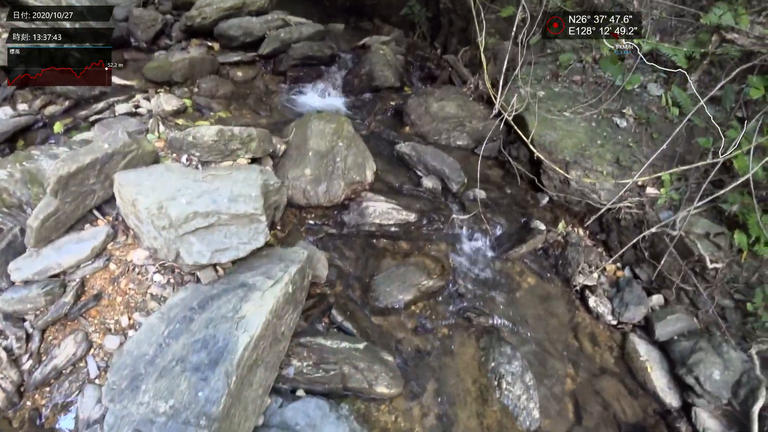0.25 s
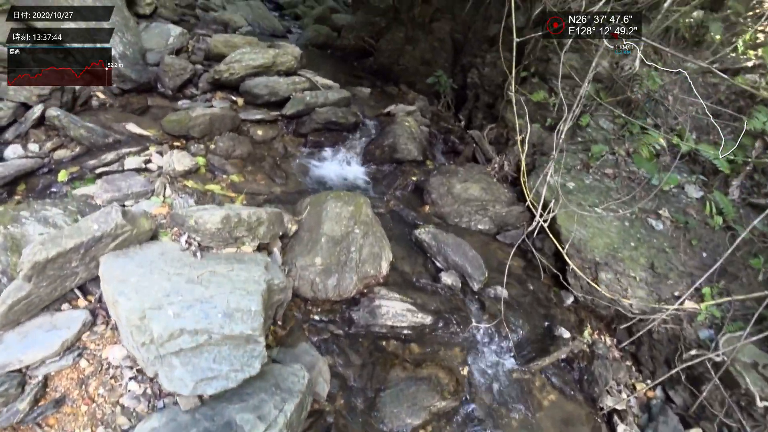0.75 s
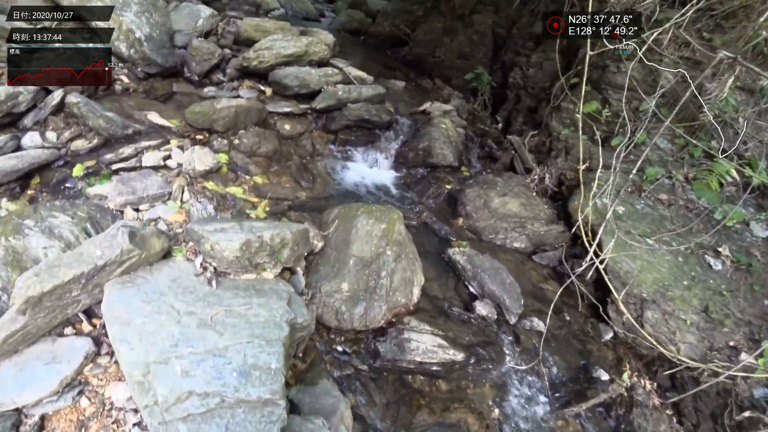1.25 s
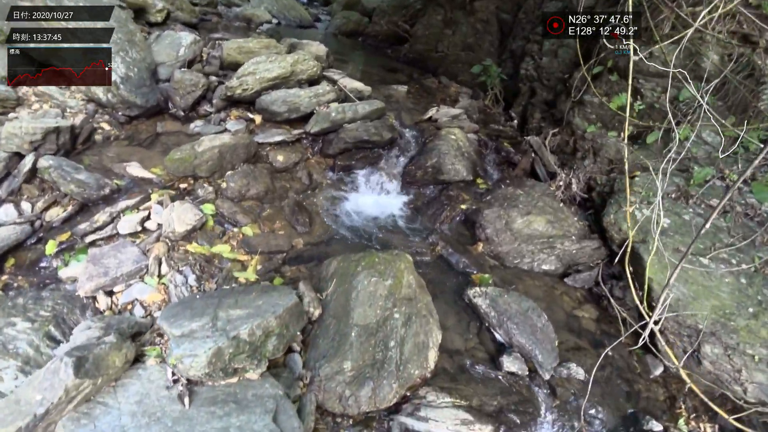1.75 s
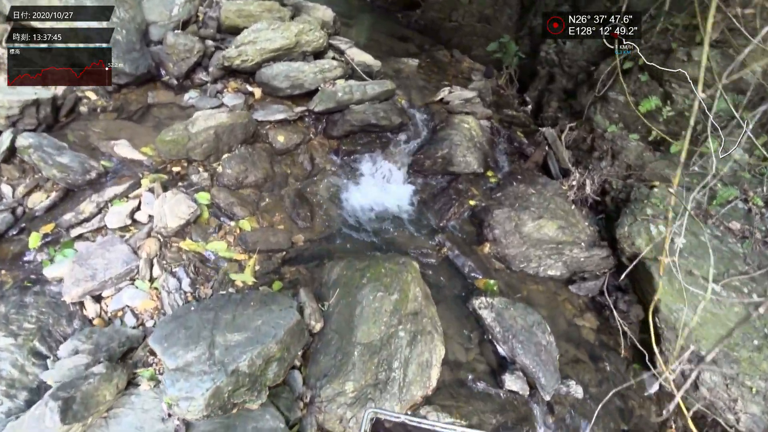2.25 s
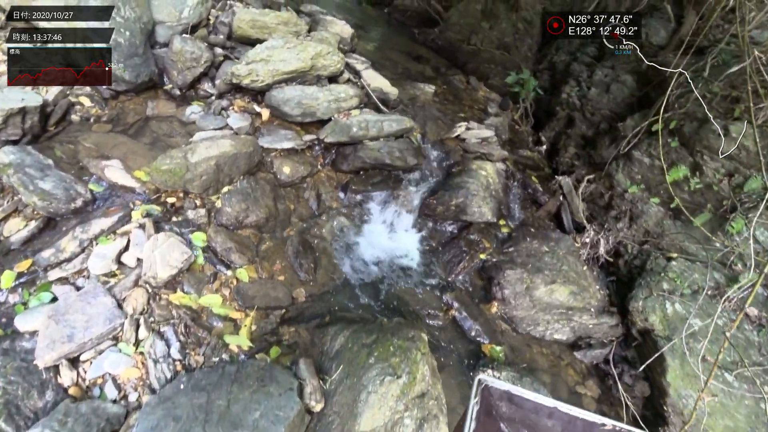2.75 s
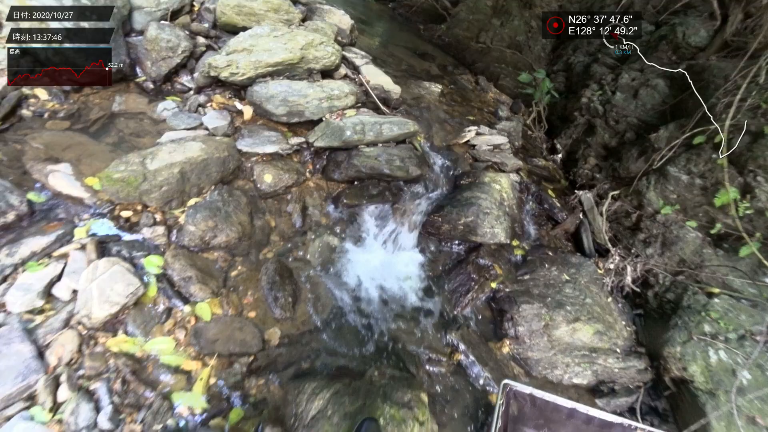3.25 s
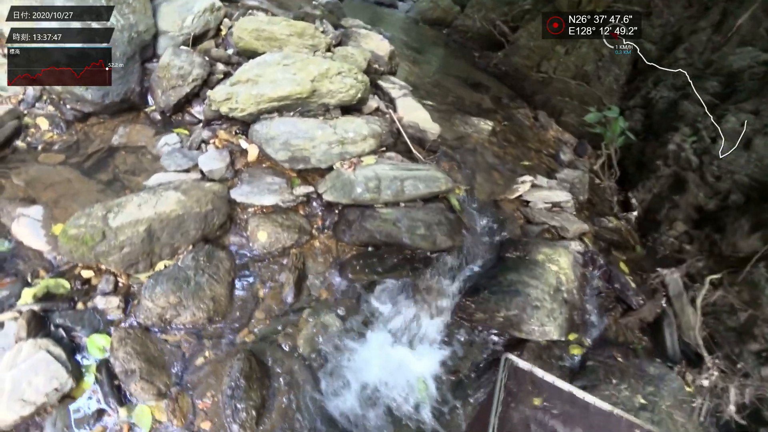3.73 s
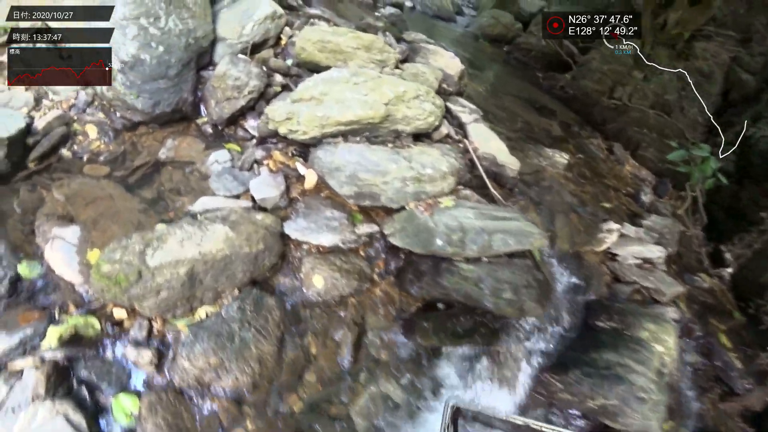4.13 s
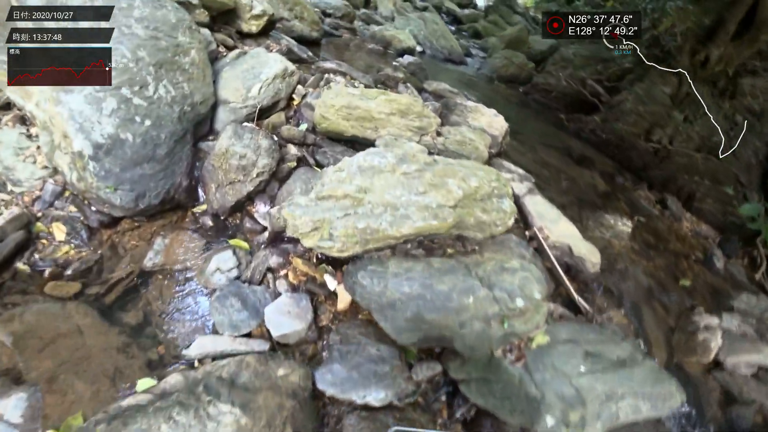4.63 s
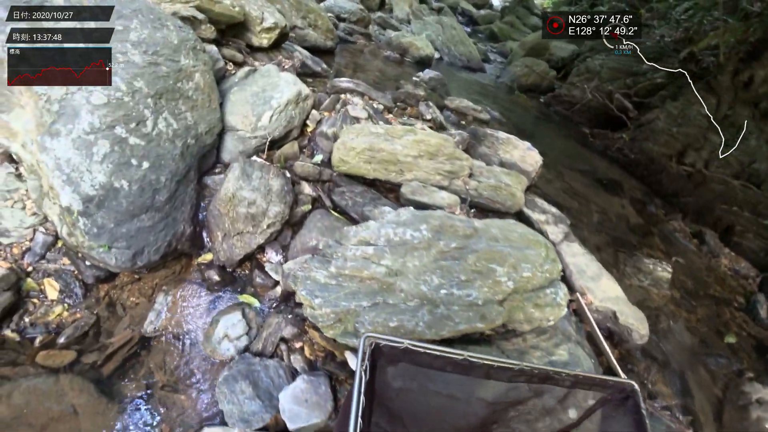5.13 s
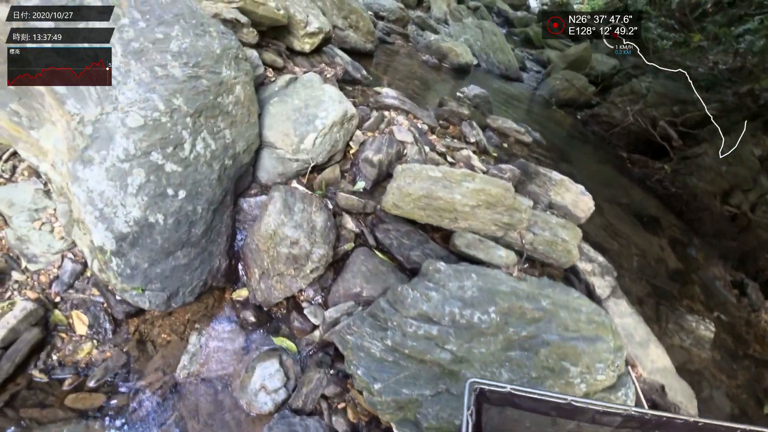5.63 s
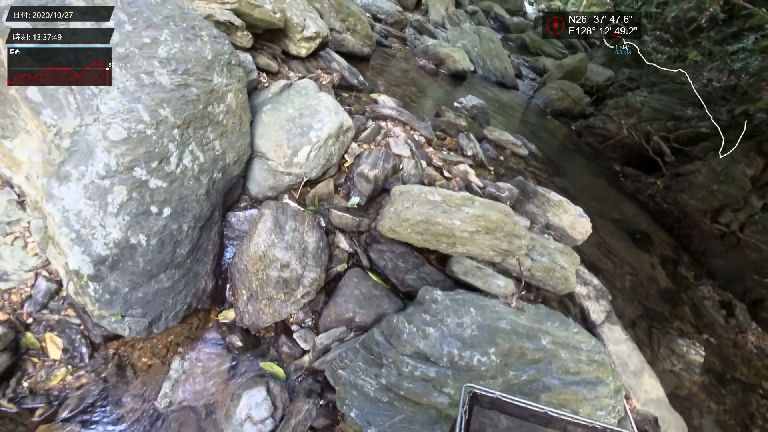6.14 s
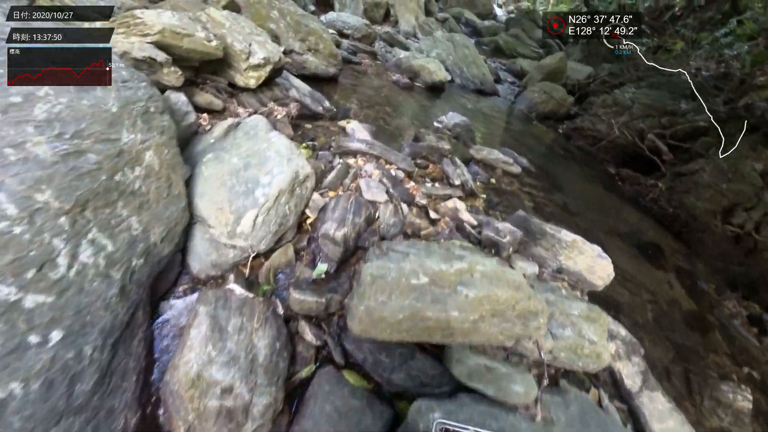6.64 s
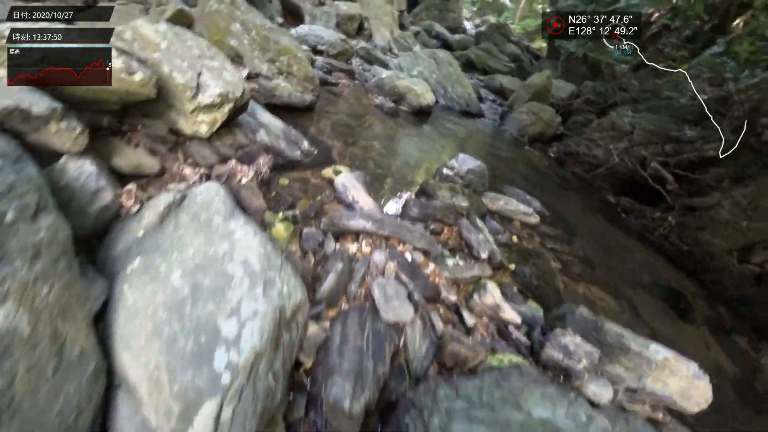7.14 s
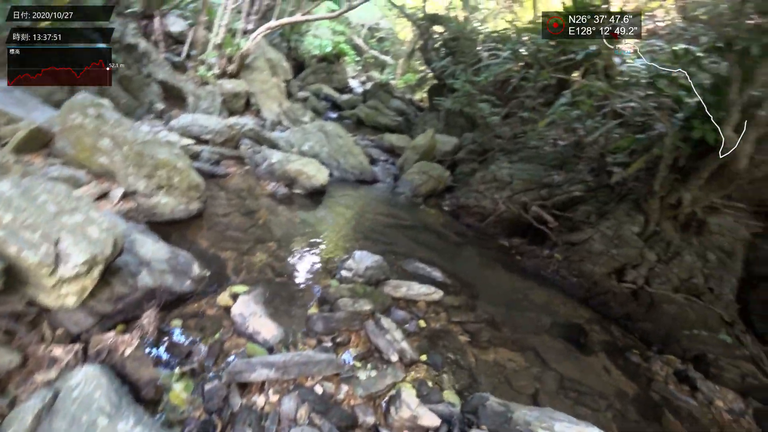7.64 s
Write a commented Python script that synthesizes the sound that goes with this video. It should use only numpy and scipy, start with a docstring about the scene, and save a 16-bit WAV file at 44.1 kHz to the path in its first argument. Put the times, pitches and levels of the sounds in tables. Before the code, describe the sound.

As a walker climbs a small rocky stream in a forest, the body-worn camera's housing knocks and rattles right at the microphones. Single clacks give way to a busy run of loud knocks and thumps, then sparser taps. The faint boxy water noise swells slightly beside a small fall, then recedes; a slight rubbing closes.

```python
"""Knocks of a hard camera case on its mount, as a walker wades up a shallow rocky stream, lead the scene.
Each blow excites a bank of damped case and mount modes, heard directly by both microphones.
Hard contacts add bursts of bright noise; small jolts of the moving body excite soft low thumps.
The stream behind is shaped noise, muffled by the case walls and mostly of opposite sign left and right;
single bubbles are short damped sines."""
import sys
import numpy as np
from scipy import signal
from scipy.fft import rfft, irfft
from scipy.io import wavfile

SR = 44100
rng = np.random.default_rng(int(sys.argv[2]) if len(sys.argv) > 2 else 0)


def dump(signal):
    """Clip the signal to [-1, 1] and save it as 16-bit WAV at the path in sys.argv[1]."""
    limited = np.clip(np.atleast_2d(signal).T, -1, 1)
    pcm = np.round(limited * 32767).astype(np.int16)
    wavfile.write(sys.argv[1], SR, pcm)


N = 347508

# Knocks of the case: start_s, clack_db (drive near 1 kHz), then relative to it
# edge_db (edge hit, upper clack), hardness_db (walls, metal and crack), flat_db (flat hit, dull body)
KNOCK_BLOWS = [(.1701, -24.5, 2.5, -9, -3), (.1977, -52.5, -6, -23, 15), (.289, -55.5, -22, -15, 11),
               (.5756, -28.5, 11.5, 4, -5), (.6807, -39.5, 2.5, -7, 0), (.8029, -33, -7, -14, -2),
               (1.051, -59, 0, -13, 8), (1.4937, -38.5, 1.5, -1.5, 5), (1.6726, -29, 7.5, -14.5, -6.5),
               (1.6915, -48.5, 0, 4.5, 7), (1.8141, -29.5, -1, -10, -3.5), (1.8395, -44, -7, -12, 10),
               (1.946, -60.5, -10, -12, 6), (2.2615, -41, 9.5, -0.5, 10), (2.364, -54, 4, -1, 10.5),
               (2.3833, -52, 1, -15, 14), (2.4074, -65, 12, -3, 25), (2.5091, -28.5, 1.5, -1.5, 3),
               (3.1644, -35.5, -2.5, -7.5, 1), (3.393, -34.5, 3.5, -14, -2), (3.464, -46, 0, -3, 20),
               (3.4739, -22.5, -1, -23, -1), (3.4807, -26.5, -5, -15, 2), (3.494, -30, 21, 9, 5),
               (3.4976, -29.5, 10, 13.5, 0), (3.5126, -51, -7, -13, -8), (3.5345, -61.5, 8, 16, 9),
               (3.5464, -60, 12, 6, 5), (3.6593, -55, -11, -11, 17.5), (3.6845, -19.5, 2.5, -16, -6),
               (3.9616, -45.5, -1, -10, 14), (4.1665, -72, 2, 23, -2), (4.2903, -39.5, 7.5, 1, 0),
               (4.297, -43, 9, -4, 23), (4.3262, -47, 0, -16, 16), (4.418, -20.5, 1, -10.5, -28),
               (4.558, -48, -15, -12, 17.5), (4.5836, -21, 6.5, -7.5, -29), (4.6278, -22.5, 2, -11, -10.5),
               (4.6464, -56.5, -3, -0.5, -6), (4.7613, -44.5, 0, -22, 16), (4.8015, -18, 10, -15, -14.5),
               (4.8272, -40.5, 2, -7, -2), (4.8884, -59, -8, -6, 11), (4.954, -25.5, 2.5, -13.5, -7.5),
               (5.0436, -30.5, 6, -1.5, -6.5), (5.4024, -56, -6, 0, 15), (5.4541, -55, -8, -11, 12),
               (5.5776, -37.5, -11, -27, -3.5), (6.3786, -33.5, 4.5, -3.5, -7.5),
               (6.5873, -36.5, -2.5, -6, 8.5), (6.7543, -29.5, 9, -14, -7), (6.8155, -53.5, 1, -24, 4),
               (6.9973, -38, -0.5, -16, -6.5), (7.0869, -41.5, 7, -2, -3), (7.107, -44.5, 0, -27, 18),
               (7.2221, -28, -4.5, -22, -1.5), (7.533, -46, 8.5, 2.5, -6)]
# Jolts of the mount: start_s, thud_db (drive), then relative to it deep_swing_db, lasting_ring_db
MOUNT_JOLTS = [(0.1702, -39, -13, -7.5), (.1977, -69, -6, 21.5), (0.6813, -57, -17, -13),
               (1.6915, -62, 7.5, -10), (1.8134, -40, -15, -17), (2.4074, -57.5, 4, -10.5),
               (2.5089, -39.5, -13, -14.5), (3.394, -61, -6, -5), (3.464, -42, -14, -10),
               (3.4793, -65, 12.5, -2), (3.493, -58.5, -8, 14.5), (3.4977, -47.5, 4, 16),
               (3.6845, -32.5, -14, -32), (3.9608, -77, -7, 10), (4.298, -46.5, -21, -7.5),
               (4.3276, -63.5, 14, 11), (4.418, -35.5, -10.5, -10), (4.558, -50, -16, -23),
               (4.6281, -35.5, -7, -11), (4.6463, -49, -16, -22), (4.7618, -44.5, -5, -13),
               (4.954, -36, -15, -12.5), (5.464, -65.5, 11.5, -2.5), (5.5769, -47, -9, -10.5),
               (6.606, -60, -12, -14), (6.705, -65, -11, -16), (6.855, -68, -10, -18),
               (6.93, -70, -10, -20), (7.0873, -55, -20, -9), (7.106, -44, 2, -10), (7.2218, -39, -11, -16),
               (7.54, -63, -15, -15)]
# Frequency regions that share a drive, as pairs low_hz, high_hz, in this order:
# clack, deep swing, thud, mount ring, hollow ring, dull body, upper clack, walls, metal ping
REGION_LIMITS_HZ = [870, 1150, 80, 114, 114, 170, 200, 300, 300, 450, 450, 870, 1150, 2000, 2000, 5200,
                    2600, 2650]
# Modes of case and mount: frequency_hz, t60_s, left_db, right_db, right_sign (+1 or -1)
CASE_MODES = [(107.6, 0.21, 4, 0.5, 1), (144, 0.047, 7.5, 3, 1), (240.3, 0.89, -3, -31, 1),
              (233.8, 0.04, 10, 13, 1), (381, .12, -4, 2.5, 1), (538.3, 0.047, 2.5, -5, -1),
              (665.5, 0.078, 4.5, 1.5, -1), (763, 0.026, 7.5, 2.5, -1), (819, 0.08, 2.5, 0.5, -1),
              (962.4, 0.07, 1, 5, -1), (1001, 0.037, 12, -0.5, 1), (1100, 0.035, 14, 7, -1),
              (1245, 0.0063, 15, 9.5, -1), (1450, 0.0094, 8, 0, -1), (1443, 0.014, -8, 1, -1),
              (1574, .025, -3.5, -7.5, -1), (1933, 0.024, -15, -6, -1), (2157, 0.018, 7.5, 5.5, -1),
              (2540, 0.013, 2.5, 11.5, -1), (2646, 0.23, -7.5, -5.5, -1), (2855, 0.018, -0.5, -24, -1),
              (3553, .02, -4.5, -4, -1), (3913, 0.014, -5, -4, 1), (4180, 0.012, -2.5, -4, -1),
              (4830, 0.015, -6.5, -19.5, 1)]
# A sleeve or strap rubbing the mount, one curve per rub: time_s, relative_level_db
RUB_CURVES = [
    [(0, -48), (.04, -59), (.07, -65), (.12, -84)],
    [(7.72, -67), (7.8, -67.5), (7.85, -58), (7.88, -58)],
]
# Stream levels, nearest while passing the small fall: time_s, rush_db, spray_treble_db
STREAM_LEVELS = [(0.0, -59.5, -68), (0.24, -63, -70), (2.96, -63.5, -69.5), (3.62, -60.5, -66.5),
                 (4.02, -62, -66.5), (4.76, -61.5, -68.5), (5.79, -65, -71), (7.62, -64.5, -72),
                 (7.88, -63.5, -71.5)]
# Stream spectrum common to both sides: frequency_hz, relative_density_db (per Hz)
COMMON_SPECTRUM = [(18, -43.5), (30, -32), (91, -33), (125, -20.5), (336, -16), (431, -14), (623, -13),
                   (671, -11.5), (778, -13.5), (859, -8.5), (1340, -10), (1710, -10.5), (3020, -18),
                   (4270, -18.5), (10900, -23)]
# Stream spectrum of opposite sign on the two sides: frequency_hz, relative_density_db (per Hz)
OPPOSITE_SPECTRUM = [(18, -78), (30, -47), (305, -19.5), (381, -16.5), (452, -17), (512, -14), (623, -12),
                     (671, -17.5), (778, -9.5), (1050, -10), (1130, -8.5), (1410, -2.5), (1800, -7.5),
                     (2140, -14.5), (10900, -35)]
# Case resonances that colour the common part of the stream: centre_hz, width_hz, boost_db
CASE_COLOURS = [(999, 46, 7), (1613, 470, 6.5)]

# case
HOLLOW_DB, HOLLOW_FOLLOWS = -14.5, 0.54   # the hollow ring takes a share of the flat hit
PING_DB, PING_GROWTH = -14, 0.9   # metal level in dB grows a little slower than that of the walls
CHOKE_DB, CHOKE_S = -3.5, .004   # a knock that comes with a jolt presses on the mount: less hollow ring
BUILD_CYCLES, SPOT_DB = 1.11, 2.5   # build-up of a mode; spread of its drive with the place of the blow
RATTLE_S, RATTLE_DB = 0.0052, -27.5   # time constant and relative level of the chatter
EARLIER_RING_DB, RUB_GAIN_DB = -43.5, -20.5
WALL_CUT_HZ = 302   # flexing walls move no air in the bass
LEFT_LAG_SAMPLES = 2
# cracks
CRACK_T60_S, CRACK_DB, CRACK_GROWTH = 0.016, -1, 1.34   # crack level favours hard blows
FIZZ_S, FIZZ_DB = 0.024, -35.0
# bumps
BUMPS_PER_S, BUMP_DB, BUMP_HZ = 14, -76.5, 130.9
# stream and bubbles
SIDE_DB, SPLIT_HZ = 6.5, 3780   # opposite part over common part; border of rush and spray
BUBBLES_PER_S, BUBBLE_DB, BUBBLE_CYCLES = 31, -68, 22   # cycles until 60 dB down
# microphones
BASS_CUT_HZ, CUTOFF_HZ, CEILING = 114, 11050, .97


def amp(db):
    """A level in decibels is twenty times the logarithm of the gain."""
    return 10 ** (np.asarray(db) / 20)


def rms_one(x):
    """Dividing by the root mean square gives unit power."""
    return x / np.sqrt(np.mean(x ** 2) + 1e-20)


def ring(force, hz, t60):
    """A damped resonator answers a unit click with a decaying sine of height 1."""
    r, w = amp(-60 / (t60 * SR)), 2 * np.pi * hz / SR
    return signal.lfilter([0, np.sin(w)], [1, -2 * r * np.cos(w), r * r], force + 1e-18)


def fade(clicks, seconds):
    """First-order relaxation turns each click into an exponential envelope."""
    return signal.lfilter([1], [1, -np.exp(-1 / (seconds * SR))], clicks + 1e-18)


def train(times, level_db):
    """An ideal blow is an impulse: one click at each time, with its level."""
    clicks = np.zeros(N)
    clicks[np.round(times * SR).astype(int)] = amp(level_db)
    return clicks


def drives():
    """Place and hardness of contact divide a blow among regions: (times, levels) in region order."""
    start_s, clack, edge, hardness, flat = np.transpose(KNOCK_BLOWS)
    jolt_s, thud, deep, lasting = np.transpose(MOUNT_JOLTS)
    walls = clack + hardness
    pressed = np.abs(start_s[:, None] - jolt_s).min(axis=1) < CHOKE_S
    hollow = clack + HOLLOW_DB + HOLLOW_FOLLOWS * flat + CHOKE_DB * pressed
    return [
        (start_s, clack),
        (jolt_s, thud + deep),
        (jolt_s, thud),
        (jolt_s, thud + lasting),
        (start_s, hollow),
        (start_s, clack + flat),
        (start_s, clack + edge),
        (start_s, walls),
        (start_s, PING_DB + PING_GROWTH * walls),
    ]


def rubbing(grit):
    """Sliding friction is a noise force whose level follows the rub curves."""
    time = np.arange(N) / SR
    envelope = np.zeros(N)
    for curve in RUB_CURVES:
        time_s, level_db = np.transpose(curve)
        envelope += amp(np.interp(time, time_s, level_db, left=-120, right=-120))
    return amp(RUB_GAIN_DB) * envelope * grit


def case_ring():
    """Modal superposition: driven modes reach each microphone with their own gain and sign."""
    out, felt = np.zeros((2, N)), drives()
    edges = np.reshape(REGION_LIMITS_HZ, (-1, 2))
    spot = rng.standard_normal((len(KNOCK_BLOWS), len(CASE_MODES)))
    grit = rng.standard_normal(N)
    rub = rubbing(grit)
    wall_cut = signal.butter(3, WALL_CUT_HZ, "high", fs=SR, output="sos")
    for k, (hz, t60, left_db, right_db, sign) in enumerate(CASE_MODES):
        # where regions overlap, the last one holds
        region = np.flatnonzero((edges[:, 0] <= hz) & (hz < edges[:, 1]))[-1]
        times, level_db = felt[region]
        blows = train(times, level_db + SPOT_DB * spot[:len(times), k])
        if t60 > .5:   # the mount still rings from an earlier knock
            blows[0] = amp(EARLIER_RING_DB)
        # loose parts chatter after the blow
        force = blows + amp(RATTLE_DB) * grit * fade(blows, RATTLE_S)
        if 600 < hz < 1800:
            force = force + rub
        # a mode builds up over about one cycle
        size = min(round(BUILD_CYCLES * SR / hz), 90) + 2
        smooth_force = signal.lfilter(np.hanning(size) * 3 / size, 1, force)
        wave = (-1) ** k * ring(smooth_force, hz, t60)   # table neighbours oppose
        if hz > 450:
            wave = signal.sosfilt(wall_cut, wave)
        out += wave * [[amp(left_db)], [amp(right_db) * np.sign(sign)]]
    out[0] = np.roll(out[0], LEFT_LAG_SAMPLES)
    return out


def cracks():
    """Hard plastic contact is brief and broadband: decaying bright noise, partly common to both sides."""
    times, walls_db = drives()[7]
    clicks = train(times, CRACK_GROWTH * walls_db + CRACK_DB)
    burst = fade(clicks, CRACK_T60_S / np.log(1000))
    fizz = amp(FIZZ_DB) * fade(clicks, FIZZ_S)   # a faint longer tail
    common, own = rng.standard_normal(N), rng.standard_normal((2, N))
    band = signal.butter(2, (4260, 8480), "band", fs=SR, output="sos")
    return signal.sosfilt(band, (burst + fizz) * (0.4 * common + 1.4 * own))


def bumps():
    """Impulsive excitation of two low modes: random small jolts of the moving body give soft thumps."""
    struck = rng.random(N) < BUMPS_PER_S / SR
    jolts = struck * amp(BUMP_DB + 2.75 * rng.standard_normal(N))
    soft = signal.sosfilt(signal.butter(2, 250, fs=SR, output="sos"), jolts + 1e-18)
    return ring(soft, BUMP_HZ, 0.09) + ring(soft, 1.2 * BUMP_HZ, 0.055)


def drift(rate_hz):
    """Low-pass filtered noise is a slow random wander, here of spread 1."""
    step = 40   # samples between computed points
    r = np.exp(-2 * np.pi * rate_hz * step / SR)
    noise = rng.standard_normal(N // step + 2002)
    slow = signal.lfilter([1], [1, -2 * r, r * r], noise)[2000:]   # drop the settling
    return np.interp(np.arange(N) / step, np.arange(len(slow)), rms_one(slow))


def coloured(spectrum, extra_db=0):
    """Spectral shaping: white noise is weighted by a curve over log frequency."""
    hz = np.maximum(np.fft.rfftfreq(N, 1 / SR), 1)
    point_hz, point_db = np.transpose(spectrum)
    level_db = np.interp(np.log(hz), np.log(point_hz), point_db) + extra_db
    return irfft(rfft(rng.standard_normal(N)) * amp(level_db), N)


def stream():
    """Many unresolved water sounds sum to noise: the rush swells and flickers, the treble less so."""
    time, hz = np.arange(N) / SR, np.fft.rfftfreq(N, 1 / SR)
    time_s, rush_db, spray_db = np.transpose(STREAM_LEVELS)
    colour_db = sum(boost / (1 + (2 * (hz - centre) / width) ** 2) for centre, width, boost in CASE_COLOURS)
    mid = rms_one(coloured(COMMON_SPECTRUM, colour_db))
    side = amp(SIDE_DB) * rms_one(coloured(OPPOSITE_SPECTRUM))
    both = np.array([mid + side, mid - side])
    low = signal.sosfiltfilt(signal.butter(2, SPLIT_HZ, fs=SR, output="sos"), both)
    high = both - low
    rush = amp(np.interp(time, time_s, rush_db) + 0.68 * drift(1.3) + 0.93 * drift(25.17))
    spray = amp(np.interp(time, time_s, spray_db) + 0.49 * drift(8.5))
    return rush * low + spray * rms_one(high)


def bubbles():
    """A bubble is a damped oscillator: random births give faint short blips at one of 14 pitches."""
    struck = rng.random(N) < BUBBLES_PER_S / SR
    born = struck * amp(BUBBLE_DB + 3.4 * rng.standard_normal(N))
    pitch = rng.integers(0, 14, N)
    blips = np.zeros(N)
    for k, hz in enumerate(np.geomspace(700, 5000, num=14)):
        blips += ring(born * (pitch == k), hz, BUBBLE_CYCLES / hz)
    return blips * np.array([[1], [-.6]])   # opposite sign left and right


def scene():
    """Linear superposition of all sources at the two microphones."""
    return case_ring() + cracks() + bumps() + stream() + bubbles()


def record(dry):
    """Band limits and saturation: deep bass drops, loud peaks are rounded, the top is cut steeply."""
    dry = signal.sosfilt(signal.butter(2, BASS_CUT_HZ, "high", fs=SR, output="sos"), dry)
    dry = dry / (1 + (dry / CEILING) ** 6) ** (1 / 6)
    return signal.sosfilt(signal.ellip(10, .3, 45, CUTOFF_HZ, fs=SR, output="sos"), dry)


dry = scene()
out = record(dry)
dump(out)
```